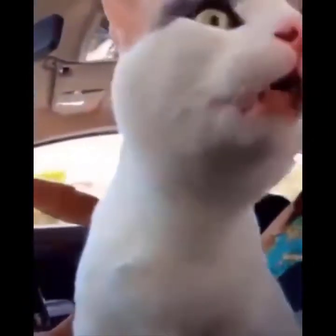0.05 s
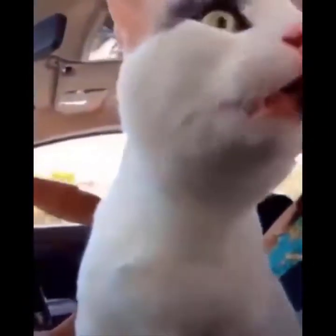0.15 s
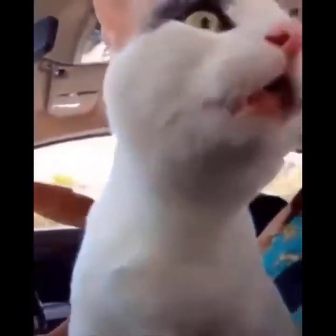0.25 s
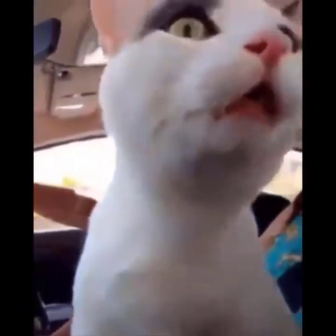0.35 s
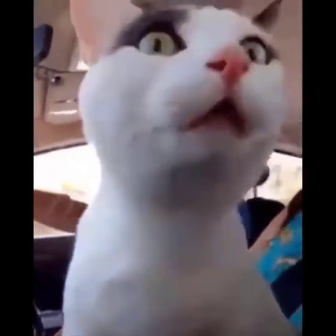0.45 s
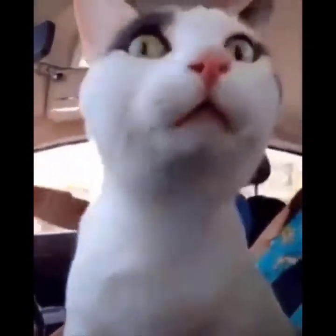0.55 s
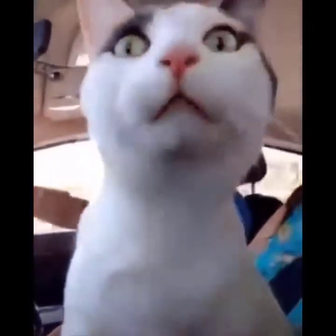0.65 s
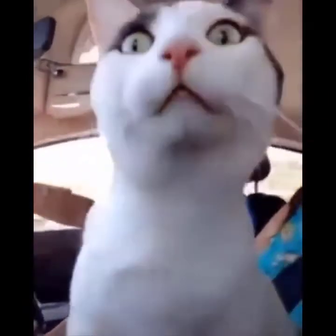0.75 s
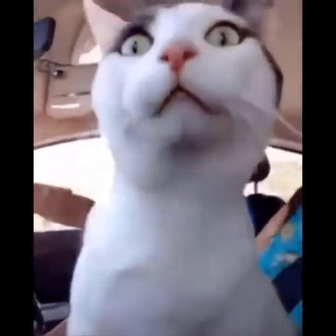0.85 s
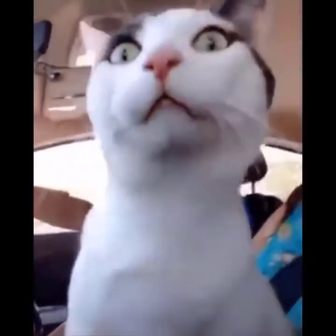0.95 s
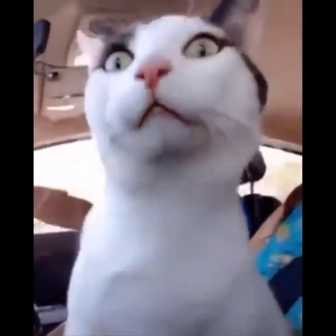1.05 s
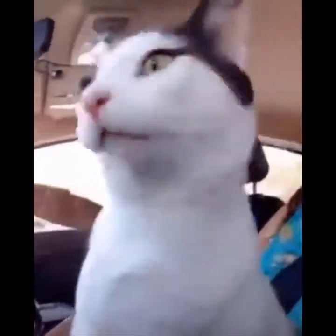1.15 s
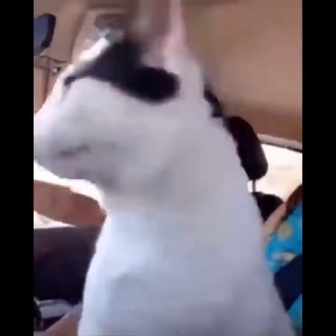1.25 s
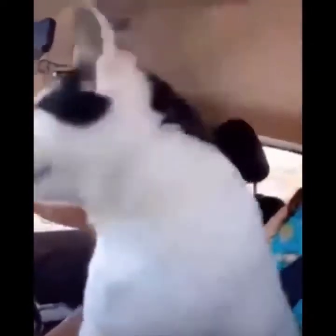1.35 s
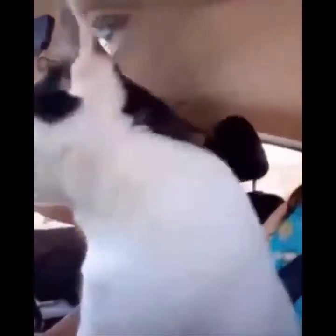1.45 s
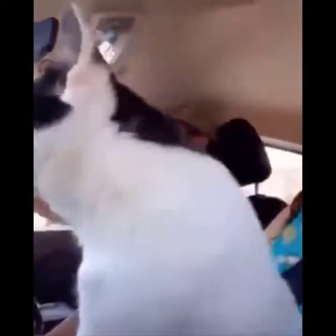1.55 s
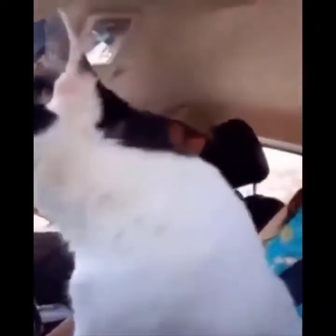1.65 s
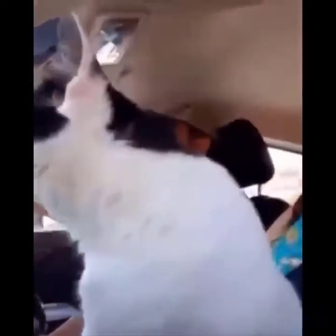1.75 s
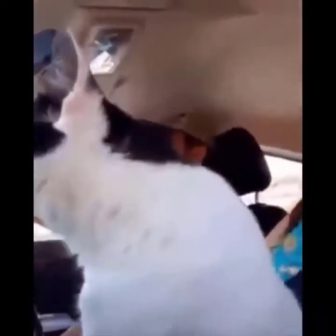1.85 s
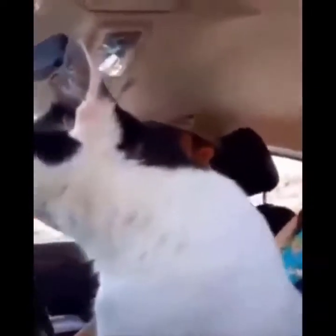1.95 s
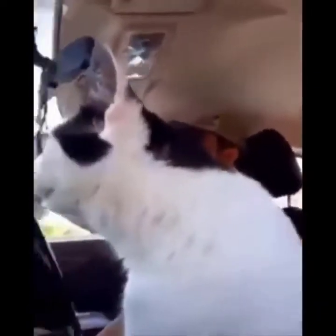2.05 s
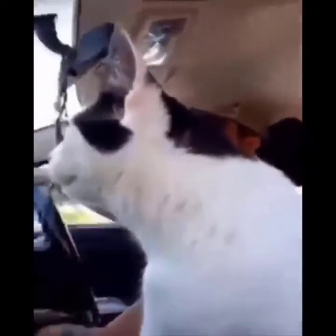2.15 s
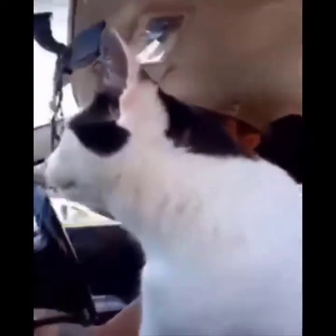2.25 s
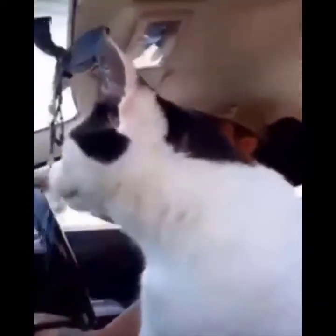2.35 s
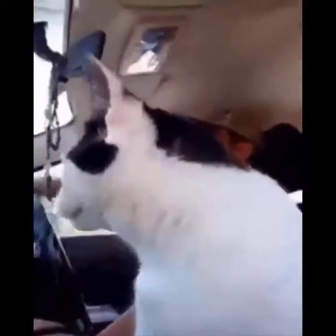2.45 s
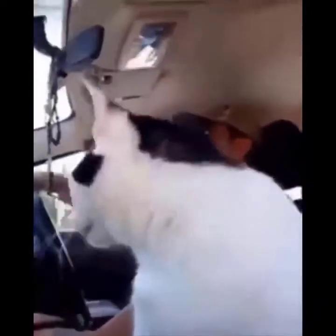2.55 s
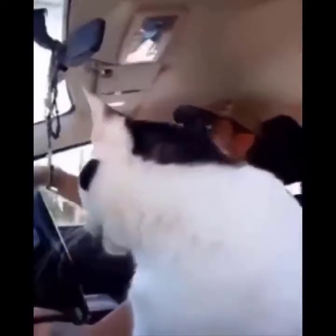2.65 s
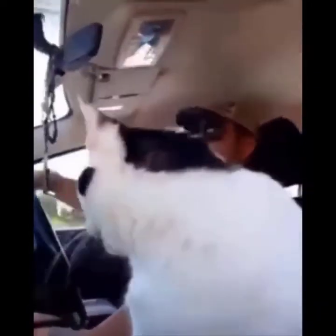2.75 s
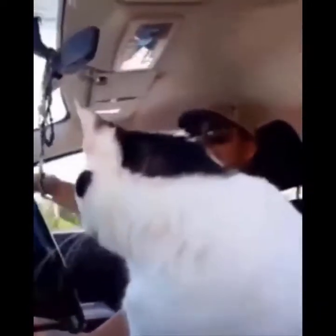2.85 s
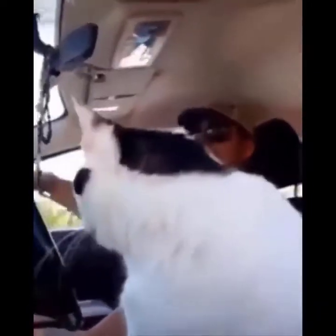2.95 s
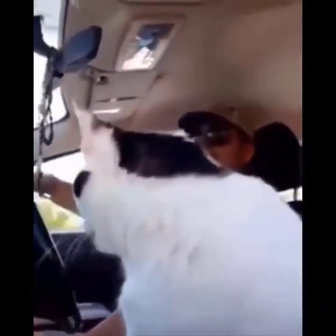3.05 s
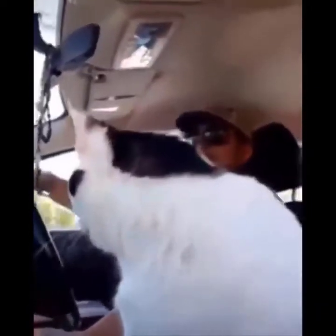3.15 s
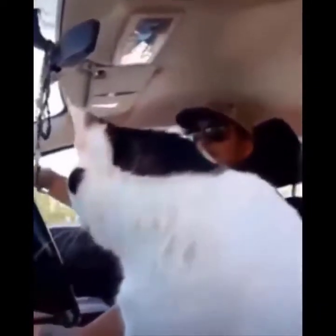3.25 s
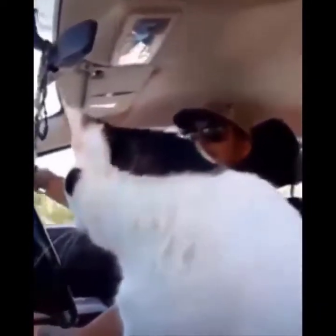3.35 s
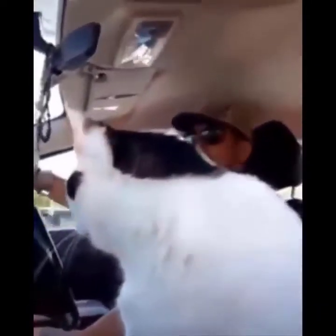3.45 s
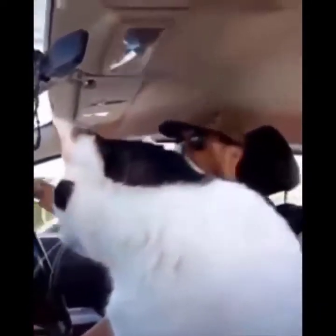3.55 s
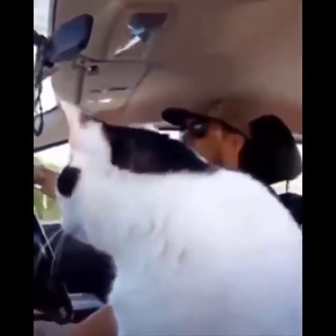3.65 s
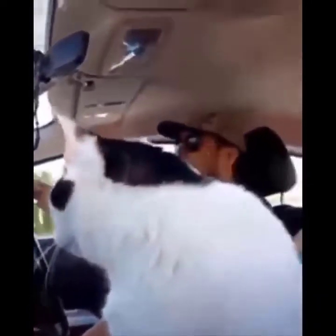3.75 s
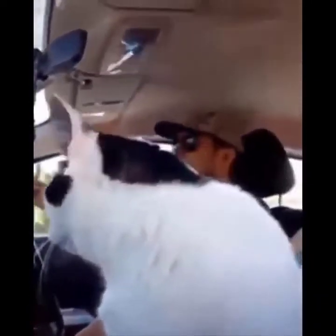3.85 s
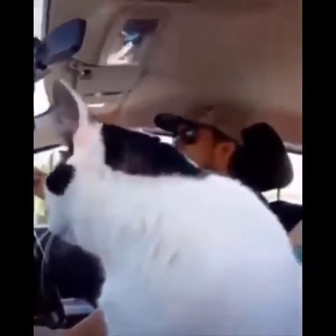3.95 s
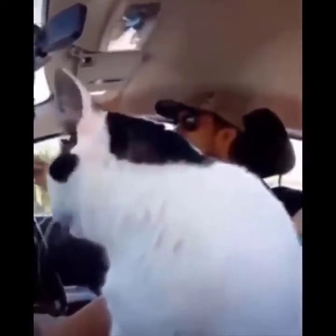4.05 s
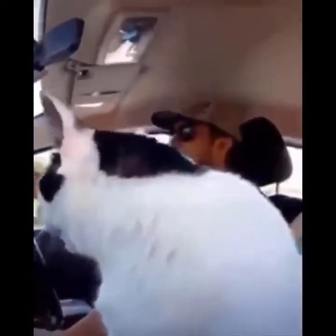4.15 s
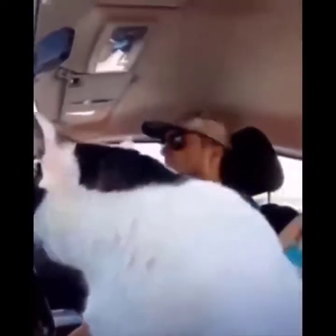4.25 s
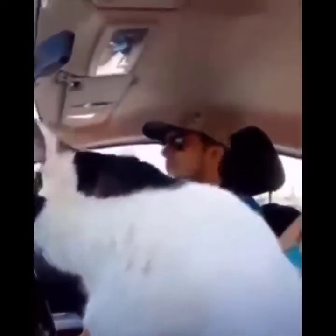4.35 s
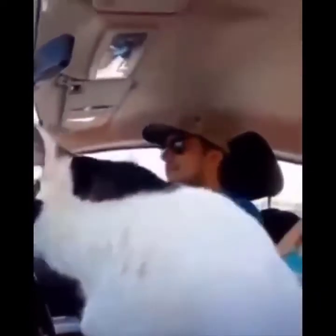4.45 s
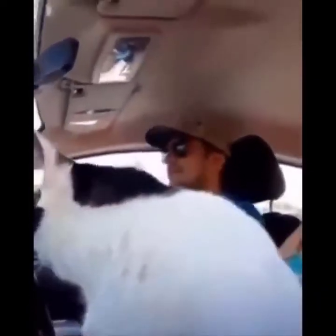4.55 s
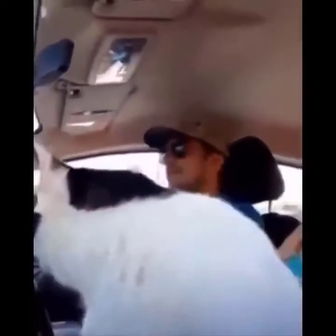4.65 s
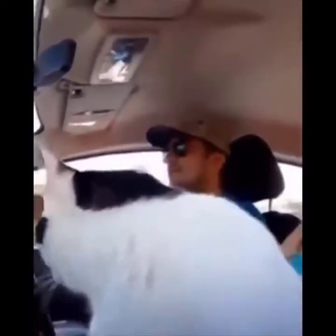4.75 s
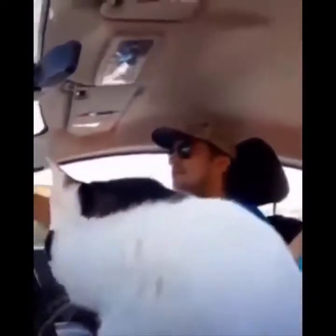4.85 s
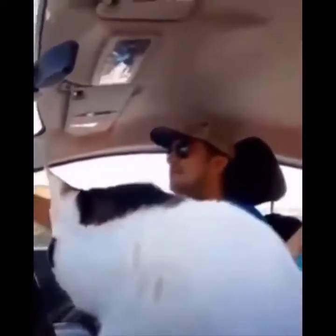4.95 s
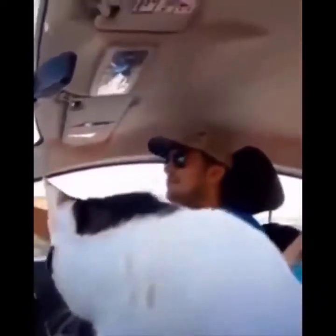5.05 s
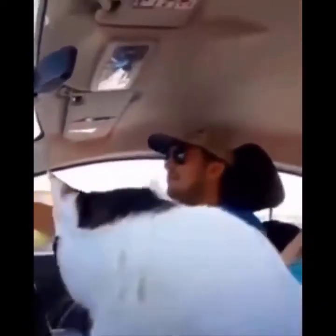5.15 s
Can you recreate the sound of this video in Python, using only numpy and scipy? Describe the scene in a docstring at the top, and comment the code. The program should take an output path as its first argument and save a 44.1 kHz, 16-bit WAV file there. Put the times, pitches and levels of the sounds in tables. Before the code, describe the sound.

A cat meows loudly, close to a stereo microphone, in the cramped dry cabin of a moving car. Low body rumble, muffled tyre roar and faint wind hiss run continuously underneath. Almost immediately, from about 0.1 to 0.85 seconds, comes the first meow: a quick upward opening into a bright, nasal, open-mouthed cry, with a small break, then falling and closing. Only driving noise follows until about 1.8 seconds, when the second call leaps upward, higher and more strained, with a rough, gravelly edge around 2 to 2.5 seconds. It breaks downward, then trails off as a thin, quiet, slightly fluttering whine to about 3.3 seconds. The road noise is left alone and gets heavier around 3.8 to 4.2 seconds. The third meow, from about 4.4 to 5.2 seconds, begins with a short low murmur, opens wide and full, then slides down and softens, over rumble and hiss now stronger than at the start.

```python
"""A cat meows close to a microphone inside a moving car: three loud calls, the second trailing into a thin whine.
Its voice is a stack of partials shaped by throat and mouth resonances, with turbulent rasp on top.
It breaks between registers, and in places the folds slip to a half, third, quarter or fifth rate.
Road rumble, tyre roar and wind hiss are shaped noise that fills the cabin and swells toward the end."""
import sys
import numpy as np
from scipy import signal
from scipy.io import wavfile
from scipy.ndimage import uniform_filter1d

SR = 44100
rng = np.random.default_rng(int(sys.argv[2]) if len(sys.argv) > 2 else 0)


def unload_wav(signal):
    """Save mono or channel-first audio to the path in sys.argv[1] as 16-bit WAV at rate SR, clipped to [-1, 1]."""
    wavfile.write(
        sys.argv[1],
        SR,
        np.round(np.clip(np.atleast_2d(signal).T, -1, 1) * 32767).astype(np.int16),
    )


N = 229442

# Pitch and throat, one table for each voiced stretch between register breaks: (time [s], pitch [Hz],
# fundamental level [dB], first throat resonance [Hz], its level [dB], second resonance [Hz], its level [dB])
VOICE = [
    [(.06, 423.5, -53, 820, -68, 2000, -62), (.08, 398, -56, 790, -46, 2020, -72),
     (.106, 477.4, -59, 1200, -45.5, 1970, -56), (.165, 496.4, -57.5, 1395, -27, 2500, -62),
     (.195, 506.6, -51, 1374, -24, 2500, -62), (.215, 512.4, -50, 1250, -27, 2080, -42.5),
     (.274, 503, -46, 1110, -24, 1870, -31.5), (.318, 452.3, -55, 890, -29, 1750, -37),
     (.34, 466, -47, 880, -28.5, 1790, -37)],
    [(.347, 495, -56, 1080, -31.5, 1600, -38), (.371, 492.6, -46, 1110, -31, 2500, -69),
     (.48, 511, -41, 1166, -33, 2350, -64), (.569, 487.4, -43.5, 1080, -37, 1800, -34),
     (.655, 455.3, -46, 953, -37, 1890, -44), (.761, 430.5, -43.5, 806, -39, 2137, -42.5),
     (.823, 409, -47.5, 801, -41.5, 2274, -48), (.85, 412, -67, 828, -68, 2230, -77)],
    [(1.78, 375, -51, 912, -47, 1906, -53), (1.795, 385.4, -54, 1166, -44, 2200, -47),
     (1.813, 449, -54, 1632, -34, 2580, -42.5), (1.843, 501, -52.5, 1714, -23.5, 2300, -45.5),
     (1.865, 508.5, -53, 1552, -28.5, 2560, -34.5), (1.872, 549.3, -65, 1436, -25.5, 2162, -41),
     (1.914, 569, -58, 1217, -23, 2257, -33.5), (1.935, 549, -84, 1115, -23.5, 2230, -50)],
    [(1.943, 599.5, -49, 1251, -29.5, 1770, -30.5), (1.987, 657.3, -38.5, 1310, -43, 1940, -58),
     (2.017, 658.6, -40, 1345, -45.5, 2536, -72), (2.15, 650.3, -34, 1300, -47.5, 2150, -49.5),
     (2.205, 658, -32.5, 1310, -42, 2000, -74), (2.32, 640.8, -32.5, 1271, -42.5, 2550, -82),
     (2.371, 623, -33, 1251, -44.5, 1870, -39), (2.413, 573.6, -41, 1150, -43.5, 1720, -44),
     (2.485, 564.4, -45, 1108, -49.5, 2180, -58)],
    [(2.495, 474, -42, 935, -57, 2009, -49), (2.505, 424, -50, 840, -41, 2070, -43.5),
     (2.543, 409.7, -42, 797, -44.5, 2277, -55), (2.565, 400.7, -72, 810, -66, 2260, -63)],
    [(2.575, 752, -76, 2250, -64.5, 3560, -103), (2.639, 681.3, -69, 2250, -43, 3520, -54.5),
     (2.725, 641, -73, 1980, -56, 2944, -35), (2.753, 621.3, -80, 1897, -39, 2614, -43),
     (2.79, 618.5, -74, 1500, -45, 2800, -48), (2.814, 619, -73, 1580, -43.5, 2760, -40.5),
     (2.91, 592.6, -62, 1240, -47.5, 2598, -58), (3.02, 564.6, -59, 1157, -63.5, 2245, -69),
     (3.068, 501, -61, 1006, -53.5, 2485, -71), (3.16, 521, -71, 1042, -68, 2127, -74),
     (3.26, 521, -62, 1040, -68, 2080, -78)],
    [(4.392, 473, -43, 940, -48, 1864, -70), (4.414, 449.5, -37.5, 885, -39, 1800, -77),
     (4.434, 406.6, -31.5, 825, -36.5, 2300, -52), (4.445, 416, -64, 840, -50, 1300, -66)],
    [(4.45, 511, -46, 1576, -54, 2510, -50.5), (4.482, 512, -50, 1479, -33.5, 2030, -58),
     (4.52, 519, -51, 1500, -27, 2114, -83), (4.54, 534, -51, 1280, -31.5, 2130, -41.5),
     (4.623, 513.7, -45.5, 1319, -24.5, 2000, -41.5), (4.66, 511.7, -47, 1300, -27.5, 2050, -47),
     (4.705, 498.4, -44, 1254, -26.5, 2082, -43.5), (4.759, 468.3, -46, 948, -29.5, 2080, -43),
     (4.787, 460.3, -52, 945, -31, 2290, -43.5)],
    [(4.795, 494.6, -46, 1190, -33, 2400, -53.5), (4.9, 483.6, -41, 1102, -38, 2410, -44),
     (4.94, 472.2, -45.5, 986, -48.5, 2303, -51), (5.07, 441.6, -45.5, 928, -47, 2234, -57),
     (5.13, 433.5, -43.5, 870, -49.5, 2168, -56.5), (5.2, 404, -48, 814, -53, 2087, -66)],
]
# Throat colour of slipped lines and low rasp: (frequency [Hz], relative level [dB])
SLIP_COLOUR = [(150, -9), (330, -11.5), (800, -4.5), (1000, -1.5), (1300, -7), (1650, -4), (1900, -11.5),
               (2200, -30.5), (3000, -27), (4000, -106)]


def gain_of(db):
    """Decibels to gain."""
    return 10 ** (np.asarray(db) / 20)


def evened(x):
    """Scales to rms 1."""
    return x / np.sqrt(np.mean(x ** 2) + 1e-20)


def read(points, hz):
    """A spectrum table at the frequencies hz, straight between points on a log frequency axis."""
    f, value = np.transpose(points)
    return np.interp(np.log(hz + 1), np.log(f + 1), value)


def curve(table, t):
    """All columns of a time table at the times t."""
    s, *columns = np.transpose(table)
    return [np.interp(t, s, column) for column in columns]


def drift(count, span):
    """Slow random wander of rms 1 that holds for about span samples."""
    span = max(int(span), 1)
    smooth = uniform_filter1d(rng.standard_normal(count), span)
    return evened(uniform_filter1d(smooth, span))


def noise(colour, patchy_db, swell_db):
    """Two-port noise of rms 1 from random short-time spectra with drifting patches and a shared swell."""
    # Left-right likeness: (frequency [Hz], correlation [-1 to 1])
    likeness = [(60, 0.97), (150, .98), (360, 0.7), (870, -0.3), (2120, -0.17), (5170, -0.2),
                (12600, -0.13)]
    # Tilt between the ports: (frequency [Hz], left over right [dB])
    road_balance = [(60, -2), (170, -0.5), (510, 0), (1480, 0), (4330, -1.5), (12600, -0.5)]
    frames, hz = N // 256 + 5, np.fft.rfftfreq(1024, 1 / SR)
    a, b, c, d, patches = rng.standard_normal((frames, 513, 5)).T
    # patches spread over 10 bins and 12 frames
    patches = evened(uniform_filter1d(uniform_filter1d(patches, 10, 0), 12, 1))

    same = np.clip(read(likeness, hz), -1, 1)[:, None]
    left = a + 1j * b
    right = same * left + np.sqrt(1 - same ** 2) * (c + 1j * d)
    level_db = read(colour, hz)[:, None] + patchy_db * patches + swell_db * drift(frames, 41)
    spectra = np.array([left, right]) * gain_of(level_db)
    spectra = spectra * gain_of(np.outer([.5, -.5], read(road_balance, hz)))[:, :, None]
    return evened(signal.istft(spectra, nperseg=1024, noverlap=768)[1][:, :N])


def road():
    """Body rumble follows the road surface; tyre roar and wind hiss grow as the car speeds up."""
    # Noise colours: (frequency [Hz], relative level per Hz [dB])
    rumble_colour = [(13, -55), (22, -5), (54, -40), (81, 2.5), (96, 0.5), (136, -7.5), (177, -9.5),
                     (293, -13), (345, -16), (407, -48), (450, -30.5), (580, -44), (990, -120)]
    roar_colour = [(240, -19), (400, 12), (625, 9), (840, 13.5), (1170, 5.5), (1270, 3), (1650, -1.5),
                   (1810, 2), (3000, -22.5), (3900, -62), (6600, -120)]
    hiss_colour = [(1290, -23), (2200, 7), (3540, 4), (4170, 4.5), (6810, -2.5), (8320, -1), (9950, -10.5),
                   (10800, -3.5), (13000, -14)]
    # Rumble loudness over the road: (time [s], level [dB])
    surface = [(0, -45.5), (.6, -49), (1.3, -45), (1.68, -43.5), (2, -48), (2.6, -47), (2.94, -44),
               (3.17, -46.5), (3.25, -43.5), (3.7, -43), (3.8, -38.5), (4.1, -38.5), (4.2, -36.5),
               (4.6, -39.5), (4.78, -43.5), (4.97, -40), (5.2, -40.5)]
    t = np.arange(N) / SR
    # levels in dB from first to last moment
    roar_db, hiss_db = np.linspace(-63.5, -50.5, N), np.linspace(-80, -68, N)

    rumble = gain_of(curve(surface, t)[0]) * noise(rumble_colour, 0.44, 1.65)
    roar = gain_of(roar_db) * noise(roar_colour, 2.6, .6)
    hiss = gain_of(hiss_db) * noise(hiss_colour, 2.8, .7)
    return rumble + roar + hiss


def settling(table, t):
    """A control that goes from its onset value to a steady one and to its end value in each stretch."""
    settle = .3  # share of a stretch that the onset and the end each take
    rows = []
    for stretch, (onset, steady, end) in zip(VOICE, table):
        a, b = stretch[0][0], stretch[-1][0]
        rows += [(a, onset), (a + settle * (b - a), steady), (b - settle * (b - a), steady), (b, end)]
    return curve(rows, t)[0]


def mouth(t):
    """Mouth controls gliding through each stretch; their levels follow the throat's loudness."""
    # One row a stretch, each with three evenly spaced points of: (bright partials [dB], top partials [dB],
    # lower mouth resonance [Hz], upper one [Hz], low rasp [dB], left over right [dB]); levels before the lift
    mouth_shapes = [
        [(-58.5, -60, 3270, 6100, -51, 6), (-61, -62, 4150, 4770, -60, -0.5),
         (-58.5, -60.5, 3700, 5100, -78, 10.5)],
        [(-66, -61.5, 3600, 4820, -78, 6.4), (-57, -60.5, 3470, 4300, -58, 7.8),
         (-59, -63.5, 3430, 4870, -62, 3.9)],
        [(-58, -54, 3400, 4700, -79, -0.5), (-67, -67.5, 3300, 4560, -77, -4), (-56, -55.5, 4320, 5560, -74, 6)],
        [(-58.5, -59.5, 3300, 6360, -45, -3.5), (-78.5, -70, 2920, 5100, -52.5, -1),
         (-67, -65.5, 3400, 4760, -35, -4)],
        [(-71, -75, 2000, 5250, -24, 0.0016), (-70, -63, 5500, 5320, -55, 0), (-55, -74, 2500, 3300, -32, 0)],
        [(-56, -78, 3090, 3550, -79, 10.5), (-75, -70, 2780, 3800, -51, -4.5), (-71, -88, 3140, 5220, -59, 7)],
        [(-78, -70, 3500, 5560, -58, 0.97), (-80, -69, 3600, 5000, -62, 1), (-74, -66, 3400, 4900, -22, 0.93)],
        [(-69.5, -65.5, 5000, 6100, -64, 2), (-62, -66.5, 3300, 4840, -78, -1), (-57, -65, 2280, 4240, -68, -2)],
        [(-58.5, -62.5, 4450, 6070, -73, -1.5), (-61.5, -70, 4070, 4940, -72, -8),
         (-66.5, -78, 3500, 5260, -68, 11.5)],
    ]
    # Bright rasp over bright partials, one row a stretch: (onset [dB], steady [dB], end [dB])
    breath = [(-5, -11, -13), (-12, -16, -11), (4, -2, -20), (0, 9, 8), (0, 0, 0), (-10, -12, -8),
              (0, 0, 0), (-7, -11, -9), (-13, -17, -11)]
    follow, effort_db = .6, -35  # share of the throat's loudness followed, about this level
    break_s, break_db = .012, -14  # the mouth layers dip while the voice changes register

    rows = []
    for stretch, shape in zip(VOICE, mouth_shapes):
        times = np.linspace(stretch[0][0], stretch[-1][0], len(shape))
        rows += [(s, *point) for s, point in zip(times, shape)]
    bright_db, top_db, low_hz, high_hz, rasp_db, pan_db = curve(rows, t)

    _, fundamental_db, _, first_db, _, second_db = curve(np.concatenate(VOICE), t)
    lift_db = follow * (np.max([fundamental_db, first_db, second_db], 0) - effort_db)
    lift_db = lift_db + break_db * sum(np.exp(-((t - stretch[0][0]) / break_s) ** 2) for stretch in VOICE)
    bright_rasp_db = bright_db + settling(breath, t)
    return (bright_db + lift_db, top_db + lift_db, low_hz, high_hz,
            rasp_db + lift_db, bright_rasp_db + lift_db, pan_db)


def bright(hz, t):
    """Level in dB through the mouth: two moving resonances, then a fixed top colour from 7 kHz up."""
    # Colour of the path to the ports: (frequency [Hz], relative level [dB])
    notches = [(2800, -10), (3100, -1), (3500, 0), (5600, 0), (6100, -12), (6500, 0), (7000, 0)]
    # Colour of the top partials: (frequency [Hz], relative level [dB])
    top_colour = [(6800, -6.5), (7600, -19), (8500, -12), (9500, -12), (10200, -25.5), (11200, -11),
                  (12200, -18), (13000, -22)]
    half_width_hz, valley_db = 270, -25
    bright_db, top_db, low_hz, high_hz = mouth(t)[:4]
    peaks = sum(1 / (1 + ((hz - f) / half_width_hz) ** 4) for f in (low_hz, high_hz))
    peaks = peaks + gain_of(2 * valley_db)  # doubled dB: these are powers
    resonant_db = bright_db + 10 * np.log10(peaks) + read(notches, hz) - 4
    return np.where(hz < 7000, resonant_db, top_db + read(top_colour, hz) - 8)


def throat(k, t):
    """Level in dB of partial k: two moving throat resonances plus the mouth; the fundamental has its own."""
    half_width_hz, steepness, floor_db = 149.4, 3.46, -35.5  # width, skirt power and valley of a resonance
    hz, fundamental_db, *pairs = curve(np.concatenate(VOICE), t)
    if k == 1:
        return fundamental_db
    power = 0
    for f, db in (pairs[:2], pairs[2:]):
        peak = 1 / (1 + abs((k * hz - f) / half_width_hz) ** steepness)
        power = power + gain_of(2 * db) * (peak + gain_of(2 * floor_db))
    power = power + gain_of(2 * bright(k * hz, t)) * (k * hz > 2600)
    return 10 * np.log10(power)


def between(t, start, end):
    """A smooth hump from start to end."""
    return np.sin(np.pi * np.clip((t - start) / (end - start), 0, 1)) ** 0.52


def rasp():
    """Turbulent air through throat and mouth, in uneven patches, partly shared by the ports."""
    frames, hz = N // 128 + 5, np.fft.rfftfreq(512, 1 / SR)[:, None]
    t = np.arange(frames) * 128 / SR
    low_db, high_db = mouth(t)[4:6]
    a, b = rng.standard_normal((frames, 257, 2, 2)).T
    patches = rng.standard_normal((frames, 257)).T
    patches = evened(uniform_filter1d(uniform_filter1d(patches, 4, 0), 24, 1))

    mouth_db = bright(np.maximum(hz, 2500), t)
    low = gain_of(low_db + read(SLIP_COLOUR, hz))
    high = gain_of(high_db + 1.2 * (mouth_db - mouth_db.max(0)) + 4.5 * patches) * (hz > 2300)
    air = a + 1j * b
    shared = air + .5 * air[::-1]  # each port hears some of the other's air
    return signal.istft(shared * (low + high) / 5, nperseg=512, noverlap=384)[1][:, :N]


def cat():
    """Partials of the fold pulses, slipped lines between them, and rasp gated each cycle."""
    # Head and cabin walls favour one port: (frequency [Hz], left over right [dB])
    cat_balance = [(60, -22), (110, -19), (200, 33), (360, -0.5), (650, 1.5), (1170, -2), (2120, -7.5),
                   (3840, -1), (6960, -23), (12600, 5)]
    # Uneven fold cycles smear the high partials, one row a stretch of pitch jitter:
    # (onset [share of pitch], steady [share], end [share])
    jitter = [(.022, .005, .006), (.005, .0022, .004), (.022, .01, .003), (.004, .006, .007),
              (.01, .008, .008), (.003, .003, .003), (.008, .008, .008), (.008, .004, .009),
              (.005, .003, .004)]
    # Lead of the left port as the head turns, one row a stretch: (onset [samples], steady [samples],
    # end [samples])
    left_lead = [(6.1, 4.2, 10.2), (5.4, 7.2, 11), (7, 5.2, 4.3), (6.9, 7.4, 6), (6.4, 6.2, 6),
                 (5.9, 7.3, 5.4), (7.3, 7, 7.4), (5, 4.7, 6), (3.1, 6.55, 8.3)]
    # The folds repeat only every few cycles, so lines appear between partials: (start [s], end [s],
    # cycles per repeat [count], level before colour and lift [dB], throat resonance that lifts them [Hz])
    slips = [(0.434, 0.516, 2, -70, 1268), (1.992, 2.131, 2, -46, 1670), (2.06, 2.212, 4, -51.5, 817),
             (2.091, 2.219, 4, -53, 1470), (2.133, 2.334, 2, -64, 969), (2.081, 2.393, 5, -58, 378.4),
             (2.349, 2.47, 3, -49.5, 780), (4.86, 4.95, 2, -64, 1190), (5.05, 5.13, 2, -67, 1078)]

    t = np.arange(N) / SR
    voiced = sum((t > rows[0][0] - .005) & (t < rows[-1][0] + .018) for rows in VOICE) > 0
    on = np.flatnonzero(voiced)
    t = t[on]
    slow = t[::64]  # control times
    hz = curve(np.concatenate(VOICE), slow)[0]
    pan_db, lead = mouth(slow)[-1], settling(left_lead, slow)
    uneven = 1 + settling(jitter, t) * drift(len(t), 135)
    turns = np.cumsum(np.interp(t, slow, hz) * uneven) / SR  # fold cycles so far
    side, out = np.array([[.5], [-.5]]), np.zeros((2, len(t)))

    def line(k, db, shimmer_db, part):
        """One line at k times the pitch, with wandering level and a phase offset between the ports."""
        slipped = k % 1
        wander = drift(3 * len(slow), 14 if slipped else 20).reshape(3, -1)
        db = db + shimmer_db * (wander[0] + .5 * wander[1:])
        db = db + side * (pan_db + read(cat_balance, k * hz))
        # low lines reach the far port later; higher ones have a random offset [cycles]
        shift = side * (k * lead * hz / SR if k < 7 else .2 * wander[1])
        if slipped:
            shift = shift + .2 * wander[2]  # slipped lines waver
        size = np.array([np.interp(t[part], slow, row) for row in gain_of(db)])
        shift = np.array([np.interp(t[part], slow, row) for row in shift])
        return np.sqrt(2) * size * np.cos(2 * np.pi * (k * turns[part] + rng.random() + shift))

    for k in range(1, 31):
        if k < 7:
            out += line(k, throat(k, slow), .7, slice(None))
        else:
            out += line(k, bright(k * hz, slow), 4.5, slice(None))

    # a faint fast flutter roughens the last of the whine
    flutter_hz, depth = 200, 0.051
    flutter = np.cos(2 * np.pi * flutter_hz * t + 2.6 * drift(len(t), 1200))
    out *= 1 + depth * between(t, 3, 3.9) * flutter

    for start, end, cycles, db, lift_hz in slips:
        part = (t > start) & (t < end)
        hump = between(t[part], start, end)
        for k in np.arange(1, 4 * cycles) / cycles:
            # only lines between partials; an even repeat sounds only its odd lines
            if k % 1 and (cycles % 2 or k * cycles % 2):
                lift_db = 11 / (1 + ((k * hz - lift_hz) / 120) ** 2)
                out[:, part] += hump * line(k, db + read(SLIP_COLOUR, k * hz) + lift_db, 3, part)

    out += rasp()[:, on] * (1 + .3 * np.cos(2 * np.pi * turns))
    voice = np.zeros((2, N))
    voice[:, on] = out
    fade = uniform_filter1d(uniform_filter1d(voiced * 1., 300), 300) ** 2  # soft edges
    return voice * fade


def cabin(x):
    """Short dense reflections from glass and seats, different at each port."""
    t60 = .1  # decay time by 60 dB [s]
    t = np.arange(4000) / SR
    signs = rng.choice([-1., 1.], (2, 4000))
    sparse = rng.random((2, 4000)) < .05
    taps = signs * sparse * (t > .002) * gain_of(-60 * t / t60)
    taps = taps / np.linalg.norm(taps, axis=1, keepdims=True)
    return signal.fftconvolve(x, taps, axes=1)[:, :N]


def scene():
    """The cat with its reflections over the road noise."""
    voice = cat()
    cabin_db = -11
    return voice + gain_of(cabin_db) * cabin(voice) + road()


def record(dry):
    """The microphone loses the deepest bass below 48 Hz, then a steep band limit at 13 kHz."""
    dry = signal.sosfilt(signal.butter(2, 48, "high", fs=SR, output="sos"), dry)
    band_limit = signal.firwin(1023, 13000, window=("kaiser", 9), fs=SR)
    return signal.oaconvolve(dry, band_limit[None], "same")


dry = scene()
out = record(dry)
unload_wav(out)
```